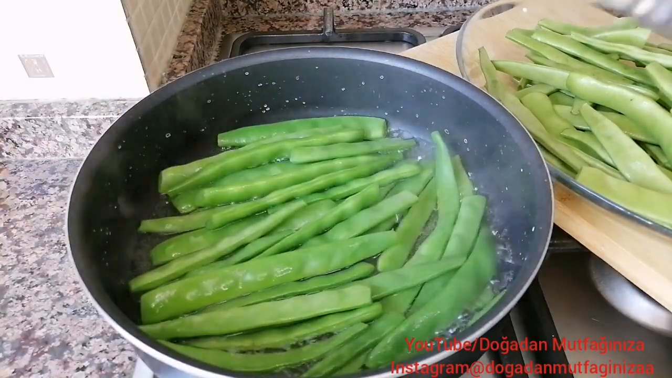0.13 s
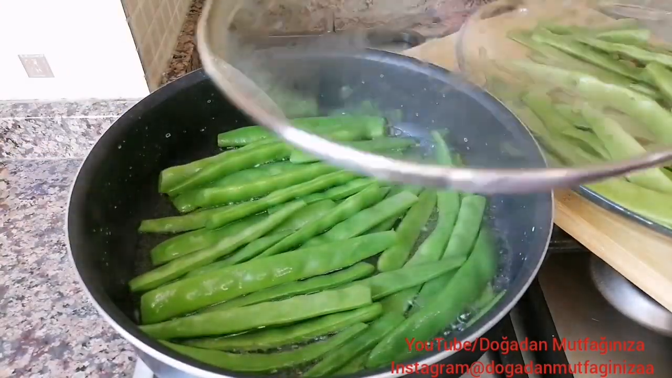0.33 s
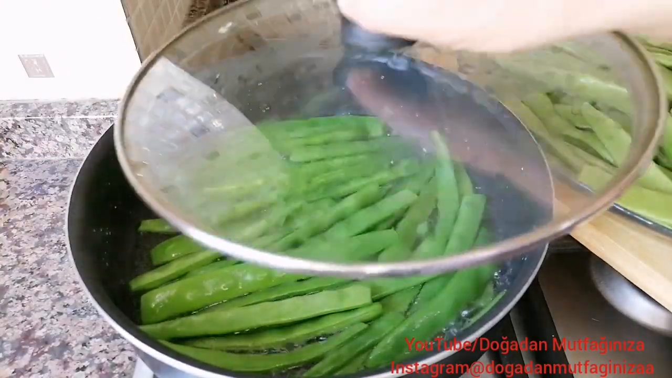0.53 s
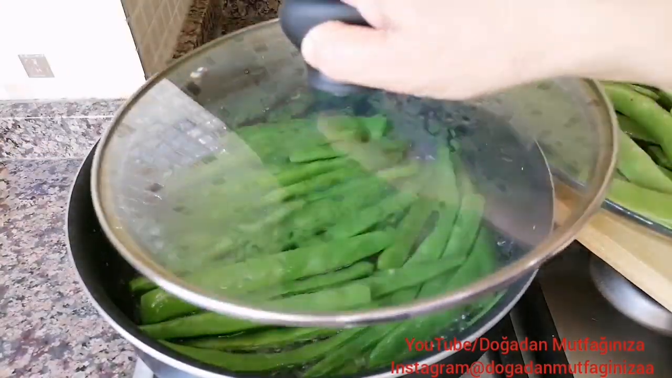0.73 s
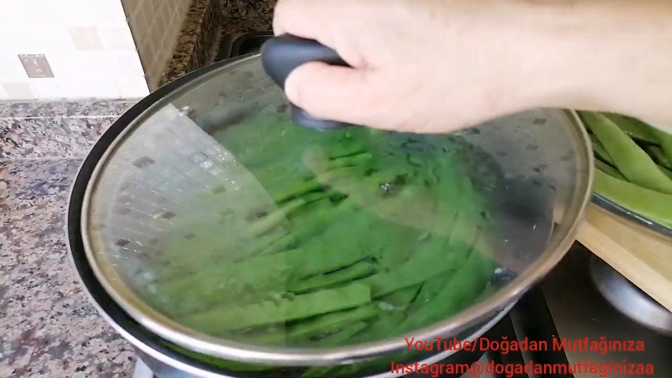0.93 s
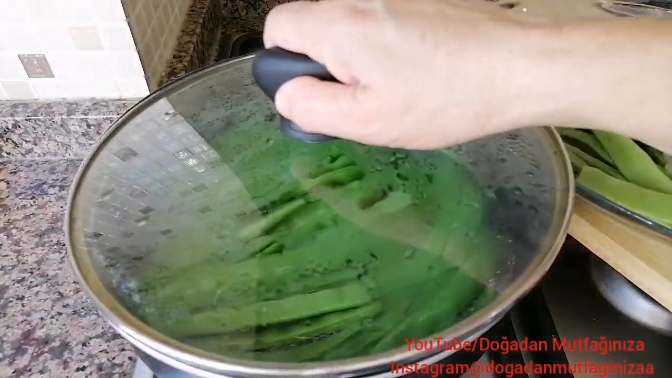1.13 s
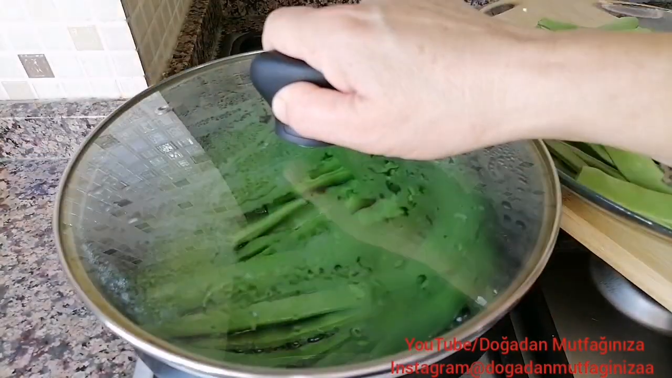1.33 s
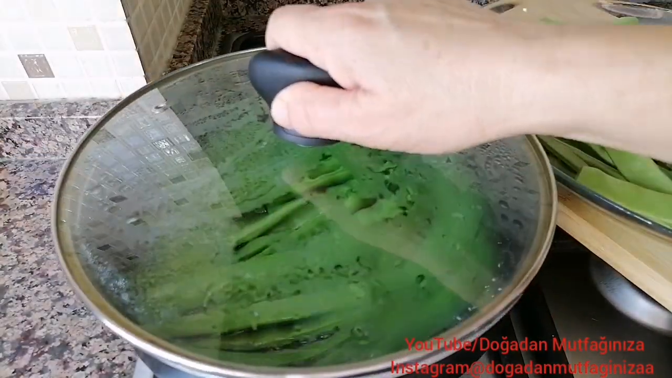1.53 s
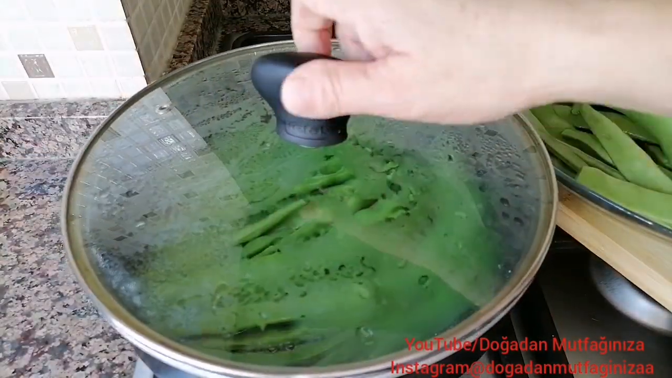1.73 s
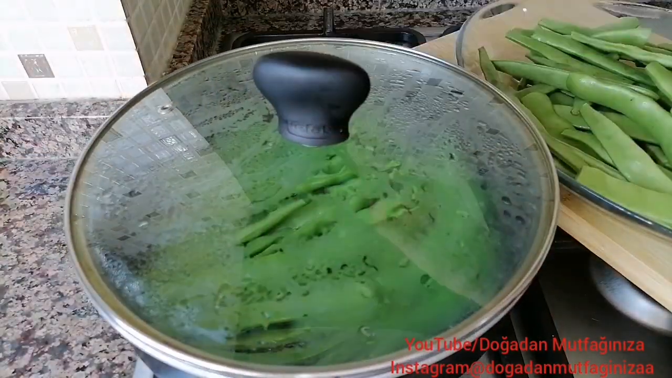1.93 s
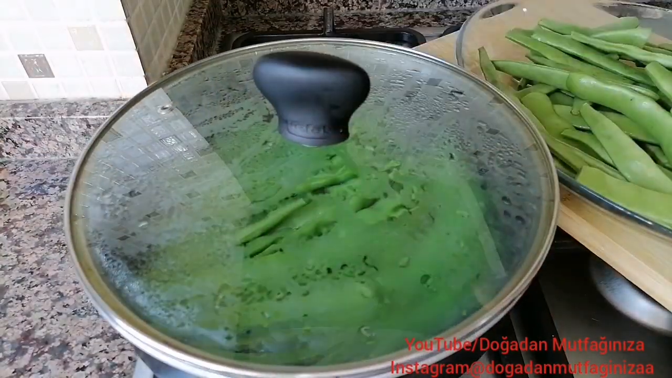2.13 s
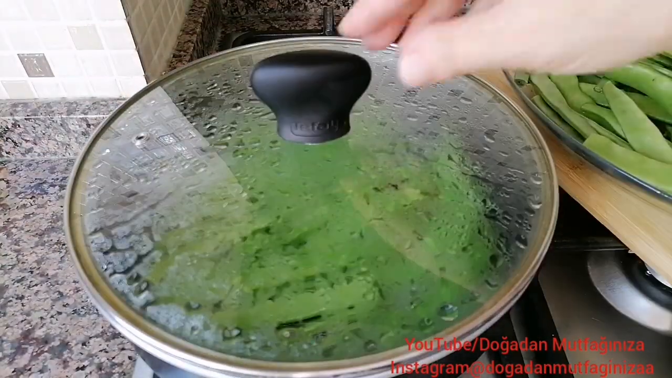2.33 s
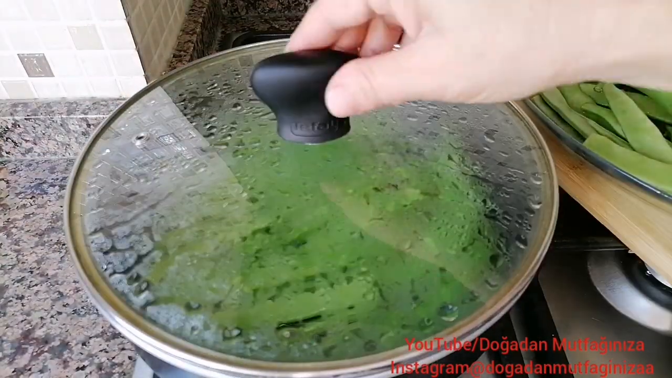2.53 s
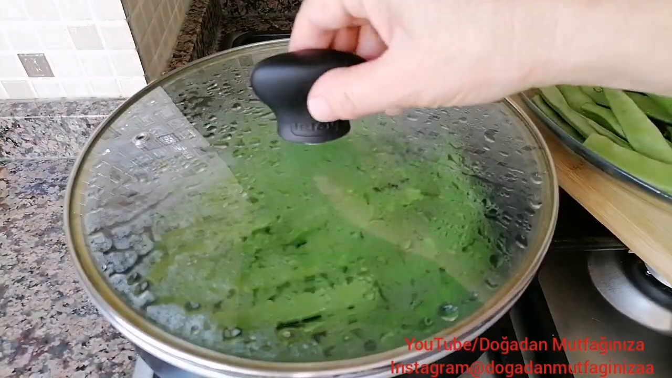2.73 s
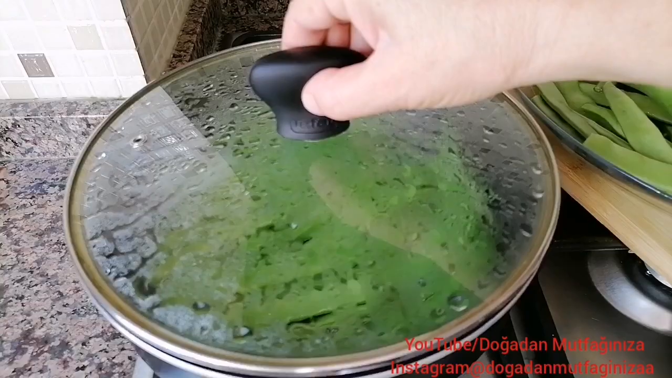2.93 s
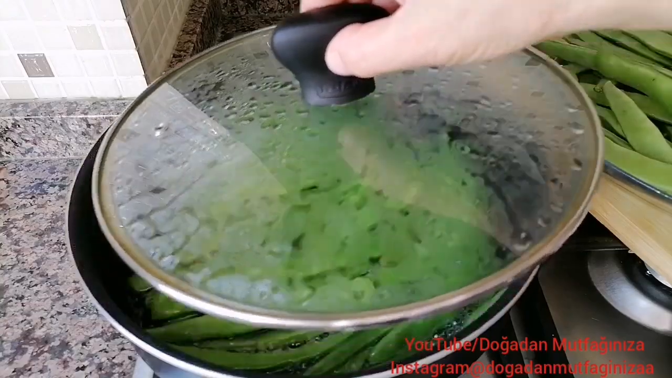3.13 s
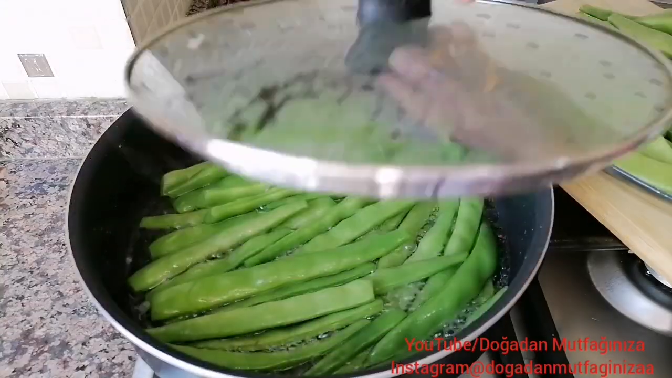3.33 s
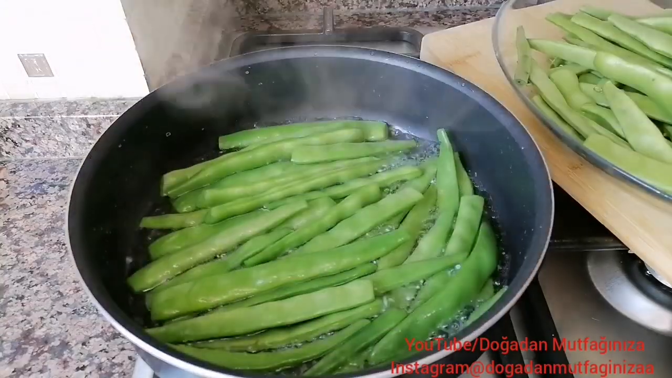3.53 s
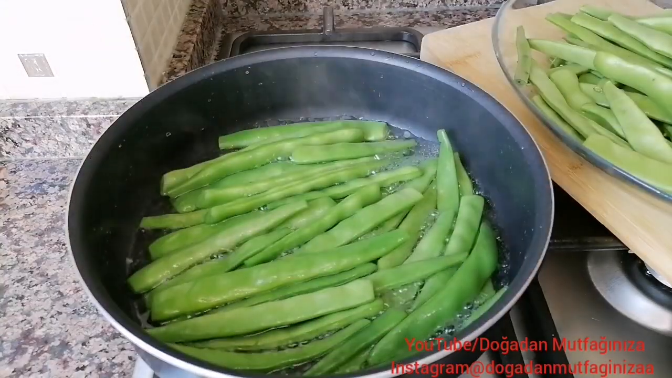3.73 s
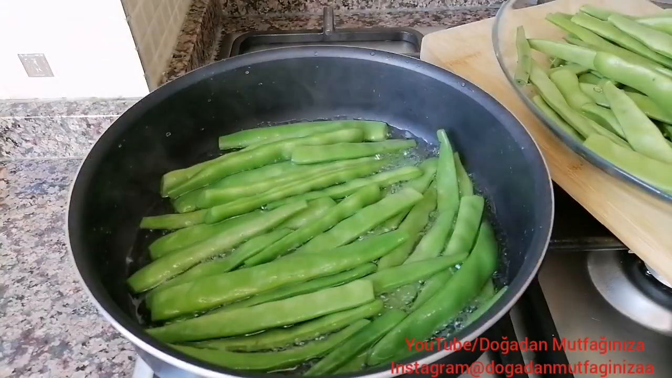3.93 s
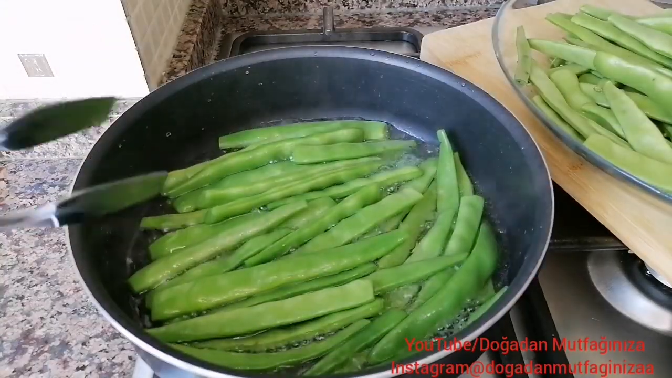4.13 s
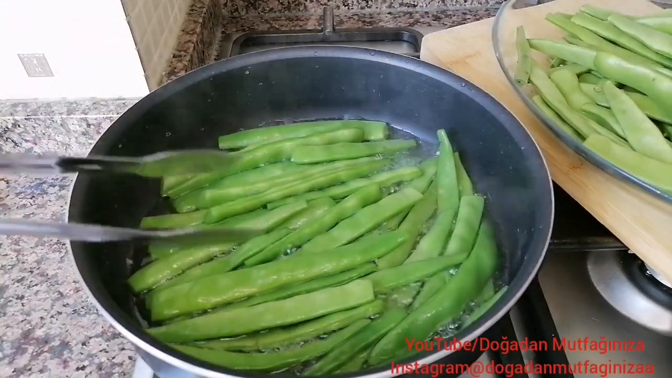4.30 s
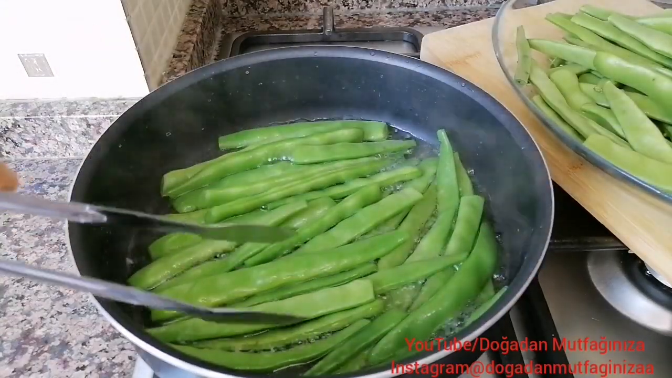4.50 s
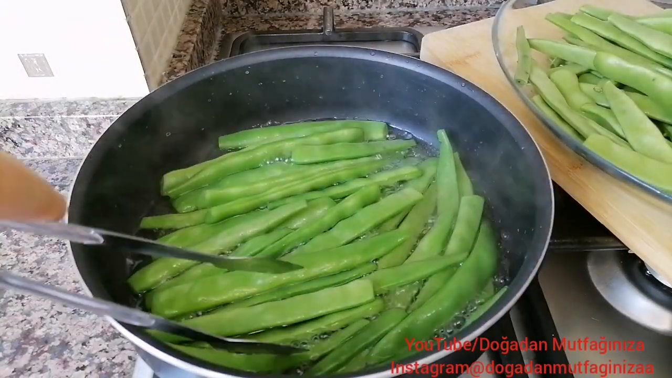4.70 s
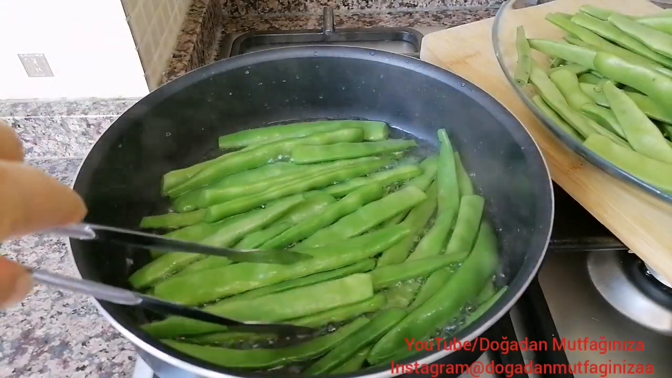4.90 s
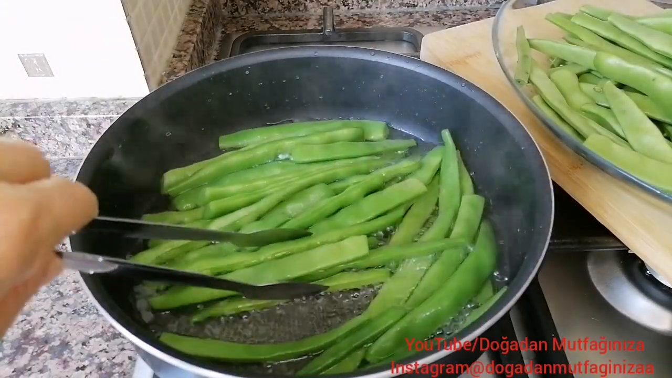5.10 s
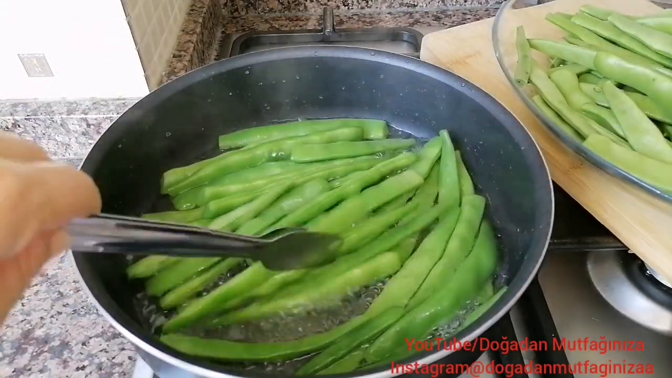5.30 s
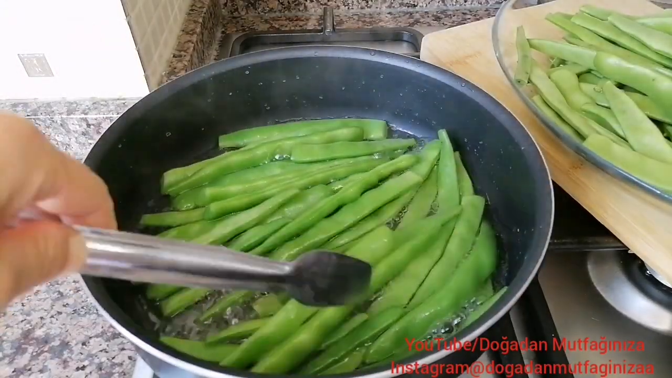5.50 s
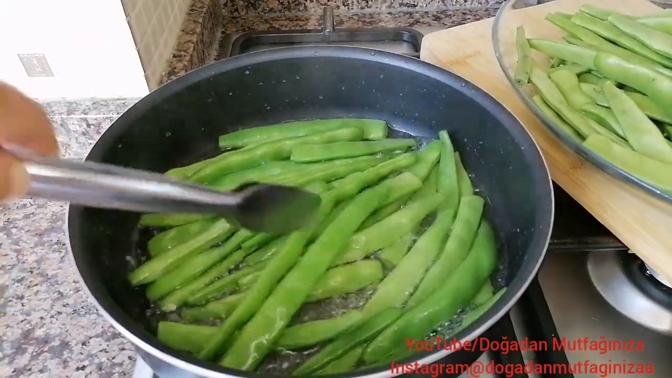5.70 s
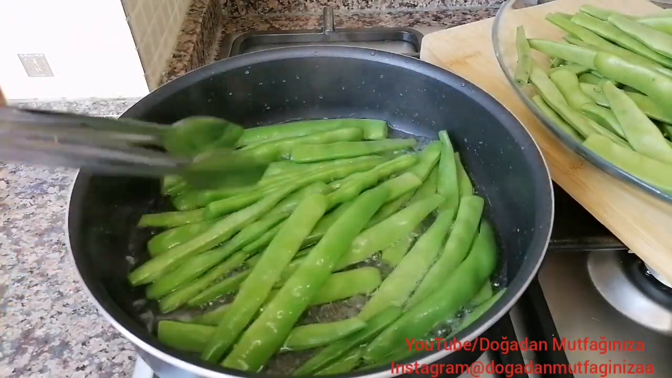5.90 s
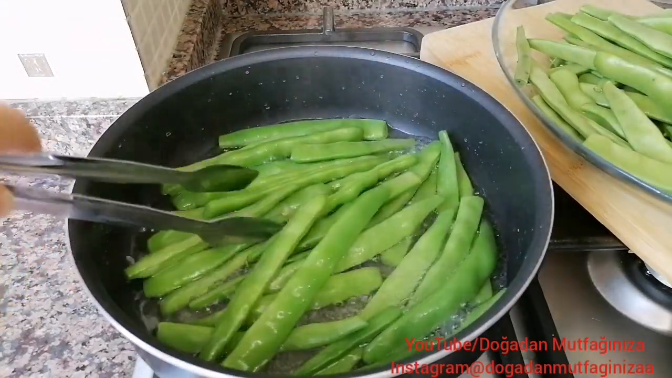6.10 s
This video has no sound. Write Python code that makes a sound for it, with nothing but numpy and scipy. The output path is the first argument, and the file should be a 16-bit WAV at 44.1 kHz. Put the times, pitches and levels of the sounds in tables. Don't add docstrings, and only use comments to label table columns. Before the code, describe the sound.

A steady fizzing simmer with snapping droplets is heard close up in a tiled kitchen. The lid clatters onto the rim, glass and metal ringing briefly, and a last heavy knock booms through the cooker. The sound abruptly becomes softer, with faint squeaking steam under the lid. Lifting it opens the sizzle with soft hollow whooshing tones, then plopping bubbles, a gentle tap and thin, bright metallic scrapes.

```python
import sys
import numpy as np
from scipy import signal
from scipy.fft import rfft, irfft, next_fast_len
from scipy.io import wavfile
from scipy.ndimage import uniform_filter1d, map_coordinates

SR = 44100
rng = np.random.default_rng(int(sys.argv[2]) if len(sys.argv) > 2 else 0)


def unload_audio(sound):
    columns = np.transpose(np.atleast_2d(sound))
    steps = np.round(np.clip(columns, -1, 1) * 32767)
    wavfile.write(sys.argv[1], SR, steps.astype(np.int16))


def magnitude_from_level(level_db):
    exponent = np.asarray(level_db, float) / 20
    return 10 ** exponent


N = 271215
CUT = 2.195

# start_s, share (0-1)
LID_COVER = [(.6, 0.38), (1.06, 0.36), (1.25, 0.82), (1.5, 0.93), (3.05, 1), (3.2, 0.98), (3.5, 0.69)]


def unit(x):
    return x / np.sqrt(np.mean(x ** 2) + 1e-20)


def along(points, hz):
    f, v = np.transpose(points)
    return np.interp(np.log(hz + 1), np.log(f + 1), v)


def over_time(points):
    s, value = np.transpose(points)
    return np.interp(np.arange(N) / SR, s, value)


def wobble(rate):
    knots = rng.standard_normal(int(N * rate / SR) + 4)
    return map_coordinates(knots, [np.arange(N) * rate / SR])


def filtered(x, response):
    m = next_fast_len(N + SR // 2)
    return irfft(rfft(x, m) * response(np.fft.rfftfreq(m, 1 / SR)), m)[..., :N]


def causal(spectrum):
    size = 2048
    level = magnitude_from_level(along(spectrum, np.fft.rfftfreq(size, 1 / SR)))
    ceps = irfft(np.log(np.maximum(level, 1e-4)))
    ceps[1:size // 2] *= 2
    ceps[size // 2 + 1:] = 0
    h = irfft(np.exp(rfft(ceps)))
    return h / np.linalg.norm(h)


def place(out, s, sound):
    out[:, round(s * SR):][:, :sound.shape[-1]] += sound


def bursts(count, spread_db):
    at, size, sign = rng.random((count, 3)).T
    height = magnitude_from_level(-spread_db * np.log(size + 0.0062))
    return np.bincount((at * N).astype(int), np.sign(sign - .5) * height, N)


def simmer_noise(spectrum, grainy, spread_db, patchy_db, count):
    # pitch_hz, likeness (0-1)
    likeness = [(60, 0.26), (290, 0.75), (640, 0.23), (1400, 0.066), (3100, .02), (5500, 0.091),
                (7500, 0.54), (10000, 1), (15000, 0.98)]
    z = signal.stft(rng.standard_normal((2, N)), nperseg=512)[2]
    field = uniform_filter1d(rng.standard_normal(z.shape[1:]), size=6, axis=0)
    field = uniform_filter1d(field, size=8, axis=1)
    pair = unit(signal.istft(z * magnitude_from_level(patchy_db * unit(field)), nperseg=512)[1][:, :N])

    def mid_side(hz):
        turn = np.arccos(np.clip(along(likeness, hz), -1, 1)) / 2
        return np.array([np.cos(turn), np.sin(turn)])

    mid, side = filtered(pair, mid_side)
    grains = unit(bursts(count, spread_db))
    left = mid + side + grainy * grains
    right = mid - side + grainy * np.roll(grains, shift=5)
    return unit(signal.fftconvolve(np.array([left, right]), causal(spectrum)[None], axes=1)[:, :N])


def simmer():
    # pitch_hz, level_db (per Hz)
    rumble_colour = [(12, -39), (20, 4.5), (75, 0.5), (113, 1.5), (189, -7), (300, -3.5), (390, -27.5),
                     (660, -120)]
    bubble_colour = [(120, -31.5), (200, -36), (286, -19.5), (325, -2.5), (393, -7.5), (435, -8),
                     (464, -7.5), (671, -9.5), (743, -5.5), (1020, -9), (1400, -7.5), (1790, -10),
                     (2560, -11.5), (2940, -7.5), (4200, -18), (5460, -45), (9240, -120)]
    fizz_colour = [(2600, -50), (3800, -33), (4330, -9), (5320, -4.5), (6210, -7.5), (7630, -7),
                   (8440, -2.5), (9000, -0.5), (9960, -4), (10900, -10), (13900, -14), (14800, -11),
                   (15300, -11), (15700, -23)]
    # start_s, level_db
    boil_vigour = [(0, 2), (.39, 2), (.9, 0.5), (1.5, -0.5), (2.19, -1), (2.21, -2), (2.45, 1),
                   (2.85, -1.5), (3.1, 0.5), (3.55, 3.5), (4, 1.5), (4.85, 0.5), (5.07, 1), (5.25, 2.5),
                   (5.45, 0.5), (6.15, 1.5)]
    open_db = [-63.5, -58, -56]
    lid_db = [-3.5, -14, -6.5]
    follows = [0.32, 1, 1.6]
    later_db = [-6, -5.5, -8]
    hum_db = [-63.5, -71]
    lean_db = [0.8, -5]
    lean_drift = [-0.48, 0.64]

    t = np.arange(N) / SR
    later = (t > CUT).astype(int)
    levels = np.c_[open_db] + np.c_[lid_db] * over_time(LID_COVER)
    levels = levels + np.c_[follows] * over_time(boil_vigour) + np.c_[later_db] * later
    burble_db, patter_db, fizz_db = levels
    lean = np.take(lean_db, later) + np.take(lean_drift, later) * (t - CUT * later)
    surge = wobble(12)

    rumble = simmer_noise(rumble_colour, 0, 1, patchy_db=2.0, count=10)
    rumble *= magnitude_from_level(np.take(hum_db, later))
    bubbles = simmer_noise(bubble_colour, 0.42, 4.2, patchy_db=2.0, count=3000)
    burble = filtered(bubbles, lambda f: 1 / (1 + (f / 1100) ** 4))
    patter = bubbles - burble
    bubbles = magnitude_from_level(burble_db) * unit(burble) + magnitude_from_level(patter_db) * unit(patter)
    bubbles *= magnitude_from_level(0.2 * surge + 1.64)
    fizz = simmer_noise(fizz_colour, 0.45, 5.8, patchy_db=1.6, count=5000)
    fizz *= magnitude_from_level(fizz_db + 0.5 * surge + 0.98 * wobble(40))
    return (rumble + bubbles + fizz) * magnitude_from_level([lean / 2, -lean / 2])


def droplets():
    # start_s, level_db (peak), lean_db (left minus right)
    loud_pops = [(0.1119, -41, 13), (0.2448, -39, 2.0), (0.304, -39.5, 0.5), (0.3144, -36, 6),
                 (0.5044, -49, 2.0), (2.152, -45, 0), (3.289, -43, -3.0), (3.3603, -48.5, 5),
                 (3.3947, -52, -3.5), (3.424, -43.5, -8), (3.4394, -48, -4.0), (3.5084, -47, -15),
                 (3.576, -45, -8), (3.615, -42, -11), (3.6517, -48, -6), (3.6885, -46.5, 2),
                 (3.713, -46, 1), (3.7224, -48, -4), (3.75, -46, -2.0), (3.8218, -47, -4),
                 (3.93, -49, -0.5), (3.987, -41.5, -14), (4.023, -46, -18), (4.0487, -57, -2),
                 (4.133, -63, 1), (4.162, -47, 0), (4.2038, -54, -1.0), (4.282, -51, 17), (4.339, -47, 1),
                 (4.3869, -44, 1), (4.419, -51, -4.0), (4.458, -54, -3), (4.497, -50, -2), (4.527, -53, -2),
                 (4.705, -51, -2), (4.6399, -45.5, -3), (4.794, -48, -1.0), (4.8577, -51, 15),
                 (4.947, -50, -1.0), (4.9985, -61, 2), (5.0537, -44.5, -1.5), (5.4545, -53, -2.0),
                 (5.6958, -43.5, -2.5), (5.8892, -53, -2), (5.9142, -50, -2), (5.9835, -53, -2),
                 (3.2073, -52, -2), (6.0975, -49, -1)]
    # pitch_hz, level_db (per Hz)
    spit_colour = [(3000, -40), (5000, -19), (7000, -8), (8800, 0), (10500, -7), (14500, -13), (15600, -26)]
    per_s, small_size_db, spread_db, under_lid_db = 260, -64, 2.2, -18
    pitch_scatter = .06
    out, t = np.zeros((2, N + SR)), np.arange(600) / SR
    at, size, side = rng.random((round(per_s * N / SR), 3)).T * [[N / SR], [1], [1]]
    small_db = small_size_db - spread_db * np.log(size + .02)
    small_db += under_lid_db * np.interp(at, *np.transpose(LID_COVER))
    for s, db, pan_db in loud_pops + list(zip(at, small_db, 8 * (side - .75))):
        snap = rng.standard_normal(len(t)) * (magnitude_from_level(-60 * t / .009) + .3 * magnitude_from_level(-60 * t / .03))
        pitch = np.exp(pitch_scatter * rng.standard_normal())
        snap = np.convolve(snap, causal(spit_colour * np.array([pitch, 1]))[:200])
        pan = np.array([[pan_db], [-pan_db]]) / 2
        place(out, s, magnitude_from_level(db - 2.5 + pan) * snap / abs(snap).max())
    return out[:, :N]


def ticks():
    # start_s, level_db (peak), pitch_hz
    tick_events = [(2.36, -72, 1090), (3.1993, -70, 1200), (3.442, -50, 3600), (3.5996, -52, 1410),
                   (3.601, -46, 3100), (3.614, -50, 1260), (3.651, -51, 2090), (3.703, -49, 1930),
                   (3.894, -51.5, 2946), (3.903, -56, 3000), (4.095, -53.5, 2600), (4.133, -54, 1490),
                   (4.205, -48, 3300), (4.3303, -53.5, 1036), (4.5, -56, 1364), (4.5397, -51.5, 1400),
                   (4.7443, -57, 1380), (4.798, -53, 1270), (4.944, -55, 1380), (5.025, -58, 1390),
                   (5.115, -53, 3060), (5.137, -51, 2900), (5.138, -56, 6800), (5.4, -55, 1900),
                   (5.406, -54, 400), (5.412, -56, 1000), (2.499, -53, 302), (2.986, -52.5, 220),
                   (5.723, -56, 945)]
    cycles = 3.4
    out, t = np.zeros((2, N + SR)), np.arange(600) / SR
    for s, db, hz in tick_events:
        tick = np.sin(2 * np.pi * hz * t) * np.exp(-t * hz / cycles) * (1 - t / t[-1])
        place(out, s, magnitude_from_level(db - 2.5 + np.array([[-1.5], [1.5]])) * tick)
    return out[:, :N]


def plops():
    # start_s, level_db (peak)
    plop_events = [(2.499, -55.5), (2.987, -57), (3.141, -57), (3.275, -53), (3.326, -56), (3.727, -54.5),
                   (3.849, -52), (4.112, -51), (4.211, -50), (4.26, -50.5), (4.438, -47.5), (4.539, -55),
                   (4.705, -48.5), (5.398, -45.5), (5.648, -49.5), (5.93, -51.5)]
    open_hz, lid_ratio, scatter = 834, 0.646, 0.076
    out, t = np.zeros((2, N + SR)), np.arange(600) / SR
    for s, db in plop_events:
        hz = open_hz * lid_ratio ** np.interp(s, *np.transpose(LID_COVER))
        hz *= 1 + scatter * rng.standard_normal()
        swell = 1 - np.exp(-t * hz * 3)
        plop = np.sin(2 * np.pi * hz * t * (1 + 8 * t)) * np.exp(-t * hz / 7.7) * swell
        place(out, s, magnitude_from_level(db - 10.0 + np.array([[-1.2], [1.2]])) * plop)
    return out[:, :N]


def nearby(x):
    echo_db, t60, change_s = -8, .05, .6
    t, clock, out = np.arange(SR // 20) / SR, np.arange(N) / SR / change_s, x.copy()
    bright = filtered(x, lambda f: 1j * f / (900 + 1j * f))
    for k in range(int(clock[-1]) + 2):
        echo = rng.standard_normal(len(t)) + 0.9 * rng.standard_normal((2, len(t)))
        echo = echo * magnitude_from_level(-60 * t / t60) * (t > .001)
        echo = magnitude_from_level(echo_db) * echo / np.linalg.norm(echo[0])
        fade = np.cos(np.pi / 2 * np.clip(clock - k, -1, 1))
        out = out + signal.oaconvolve(bright * fade, echo, axes=1)[:, :N]
    return out


def fuzzy_lines(glides, blur, flutter, steady, count):
    out, t = np.zeros(N), np.arange(N) / SR
    for s, length, from_hz, to_hz, db in glides * count:
        u = (t - s) / length
        hz = from_hz + (to_hz - from_hz) * np.clip(u, 0, 1)
        phase = 2 * np.pi * np.cumsum(hz * (1 + blur * wobble(flutter))) / SR
        swell = magnitude_from_level(db - 12 * np.clip(2 * u - 1, -1, 1) ** 4) * (abs(u - .5) < .5)
        out += swell * (steady + wobble(flutter)) * np.sin(phase)
    return out


def hollow():
    # start_s, length_s, from_hz, to_hz, level_db
    air_gap = [
        (.55, .56, 660, 500, -72),
        (2.97, .15, 220, 350, -73),
        (3.09, .1, 340, 440, -69),
        (3.18, .2, 540, 620, -72),
        (3.235, .05, 345, 335, -68),
        (3.17, .24, 340, 320, -76),
        (3.29, .15, 500, 500, -76),
    ]
    glass_bowl = [
        (3.17, .22, 1240, 1270, -76),
        (3.12, .26, 1890, 1990, -81),
        (3.12, .62, 3400, 3030, -79.5),
        (3.38, .28, 5200, 5900, -80),
    ]
    gap = fuzzy_lines(air_gap, 0.11, 60, 0.9, count=3)
    return gap + fuzzy_lines(glass_bowl, 0.053, 120, 0, count=4)


def kitchen(x):
    # pitch_hz, t60_s (time to fall 60 dB)
    echo_t60 = [(100, 0.71), (500, 0.4), (2000, 0.52), (5000, 0.36), (12000, 0.13)]
    hz, t, z = signal.stft(rng.standard_normal((2, SR // 2)), SR, nperseg=256)
    unlike = np.clip(hz / 900, .1, 1)[:, None]
    z = np.array([z[0] + unlike * z[1], z[0] - unlike * z[1]]) / np.sqrt(1 + unlike ** 2)
    tail = signal.istft(z * magnitude_from_level(-60 * t / along(echo_t60, hz)[:, None]), SR, nperseg=256)[1]
    late = np.pad(x, (250, 0))[None]
    return signal.fftconvolve(late, tail / np.linalg.norm(tail[0]), axes=1)[:, :N]


def struck(blows, modes, rise, thud, clatter_db, wet_db):
    # pitch_hz, level_db (per Hz)
    clatter_colour = [(120, -40.5), (200, -4.5), (526, -4), (680, -10), (957, -3), (1240, -15),
                      (1640, -15.5), (1980, -22), (2550, -30.5), (3750, -40), (6000, -46), (7800, -94.5),
                      (13200, -120)]
    start_scatter = .3
    out, t = np.zeros((2, N + SR)), np.arange(SR // 2) / SR
    for s, db, hard in blows:
        ring = np.zeros((2, len(t)))
        for hz, level_db, t60 in modes:
            shape = magnitude_from_level(-60 * t / t60) + thud * magnitude_from_level(-60 * t / min(t60, 0.033))
            shape *= magnitude_from_level(level_db + rng.uniform(-0.42, 1)) * (1 - np.exp(-t * hz / rise))
            apart = np.array([[1], [-1]]) * rng.normal(0.12, min(hz / 2500, 1.2))
            ring += shape * np.sin(2 * np.pi * (hz * t + start_scatter * rng.random()) + apart)
        noise = rng.standard_normal((2, len(t))).ravel()
        clatter = np.convolve(noise, causal(clatter_colour))[:2 * len(t)].reshape(2, -1)
        clatter *= magnitude_from_level(clatter_db - 60 * t / 0.21) * (1 - np.exp(-t / 0.0008))
        crack = magnitude_from_level(clatter_db - 2.5 - 60 * t / 0.0064) * (1 - np.exp(-t / 0.00083))
        crack = crack * rng.standard_normal((2, len(t)))
        push = np.hanning(3 + int(SR * 0.0024 * (1 - np.clip(hard, 0, 1)) ** 2))
        hit = signal.fftconvolve(ring / abs(ring).max() + clatter + crack, push[None] / push.sum(), axes=1)
        place(out, s, magnitude_from_level(db) * hit)
    return out[:, :N] + magnitude_from_level(wet_db) * kitchen(out[0, :N])


def lid_touch():
    # start_s, level_db, hardness (0-1)
    touches = [
        (1.0746, -18.5, 1),
        (1.098, -27, 0.53),
        (1.122, -35, 0.37),
        (1.18, -42.5, 0.4),
    ]
    # pitch_hz, level_db, t60_s
    rim_modes = [(390, 10, 0.034), (290, -16, 0.68), (552, -12, 0.4), (812, -9.5, 0.19),
                 (1060, -8.5, 0.079), (1653, -4, 0.091), (1757, -7.5, 0.09), (2110, -5.5, 0.054),
                 (2500, -10.5, 0.049), (3310, -14.5, 0.11)]
    return struck(touches, rim_modes, 1.0, 1.13, clatter_db=-13.5, wet_db=-11.5)


def lid_edge():
    # start_s, level_db, hardness (0-1)
    edge_blows = [
        (1.0755, -39, .9),
        (1.2, -37, 0.7),
        (1.8398, -17.5, 1),
    ]
    # pitch_hz, level_db, t60_s
    edge_modes = [(2470, 3, 0.026), (1260, -6, .04), (1830, -4, .03)]
    # start_s, length_s, from_hz, to_hz, level_db
    tremble = [
        (1.24, .09, 342, 335, -47),
    ]
    ring = struck(edge_blows, edge_modes, .8, .3, clatter_db=-42, wet_db=-28)[0]
    return ring * np.array([[1.2], [-.8]]) + fuzzy_lines(tremble, .02, 40, 3, count=1)


def cooker():
    # start_s, level_db, hardness (0-1)
    jolts = [
        (1.077, -36, 0),
        (1.2, -47, 0.4),
        (1.38, -41.5, 0.4),
        (1.45, -46, 0.6),
        (1.841, -10.5, 0),
    ]
    sways = [
        (1.08, -41, 0.3),
        (1.15, -50, 0.1),
        (1.22, -46.5, .2),
        (1.44, -48, .2),
    ]
    # pitch_hz, level_db, t60_s
    boom_modes = [(63.7, -9.5, 0.85), (104, -1, .2), (117.6, 0.5, 0.56), (173.2, -5, 0.52),
                  (225, -5.5, 0.31)]
    support_modes = [(59.8, -2, 0.59), (86, -7, 0.36)]
    boom = struck(jolts, boom_modes, 0.11, 1.12, clatter_db=-41.5, wet_db=-20.0) * magnitude_from_level([[1.1], [-1.1]])
    return boom + struck(sways, support_modes, 0.6, 0, clatter_db=-52, wet_db=-24.0)


def rattle():
    # start_s, level_db, t60_s
    shivers = [
        (1.094, -50, 0.028),
        (1.199, -59.5, 0.024),
        (1.839, -46, 0.066),
        (1.8766, -36.5, 0.063),
        (1.892, -49.5, 0.32),
        (2.153, -68, 0.15),
    ]
    # pitch_hz, level_db (per Hz)
    shiver_colour = [(1760, 1.5), (3000, -8), (3910, -14), (4290, -12), (6040, -12), (9730, -8.5),
                     (10400, -20.5), (14800, -31), (16000, -28)]
    out, t = np.zeros((2, N + SR)), np.arange(SR // 4) / SR
    for s, db, t60 in shivers:
        noise = rng.standard_normal(len(t)) + 4 * rng.standard_normal((2, len(t)))
        place(out, s, magnitude_from_level(db - 60 * t / t60) * noise)
    return signal.fftconvolve(out, causal(shiver_colour)[None], axes=1)[:, :N]


def lid_drop():
    # start_s, level_db, hardness (0-1)
    drops = [
        (1.1995, -16, 0.8),
        (1.221, -38, 0),
        (1.255, -48, 0),
    ]
    # pitch_hz, level_db, t60_s
    glass_modes = [(338, 5.5, 0.125), (258, -14, 0.2), (395, -3, 0.08), (645, -26, 0.11), (905, -5, 0.084),
                   (1550, -15.5, 0.042), (2130, -17.5, 0.027)]
    return struck(drops, glass_modes, 0.55, 2.3, clatter_db=-19, wet_db=-15.0)


def lid_rock():
    # start_s, level_db, hardness (0-1)
    rocks = [
        (1.377, -20, 0.05),
        (1.402, -24.5, 0.1),
        (1.445, -29, 0.25),
    ]
    chinks = [
        (1.419, -35, 0.63),
        (1.44, -44, 0.4),
    ]
    # pitch_hz, level_db, t60_s
    seat_modes = [(315, 4, 0.04), (256, -2.5, 0.12), (547, -16.5, 0.08), (853, -5.5, 0.1)]
    far_modes = [(883, 2, 0.11), (552, -5, 0.34), (296, 8, 0.058), (1560, -11, 0.034)]
    rock = struck(rocks, seat_modes, 1.3, 2.7, clatter_db=-16.5, wet_db=-16.0)
    return rock + struck(chinks, far_modes, 1.0, 0.59, clatter_db=-40, wet_db=-18.0)


def lid_knock():
    # start_s, level_db, hardness (0-1)
    knocks = [
        (1.805, -40, 0.14),
        (1.83, -33, 0),
        (1.8392, -11.5, 0.78),
        (1.8785, -24, 0.48),
        (1.915, -27, 0.59),
    ]
    # pitch_hz, level_db, t60_s
    stove_modes = [(323, -7, 0.25), (408, -8, 0.21), (470, -0.5, 0.04), (549, -9, 0.1), (887, 0, 0.054),
                   (1040, -13, 0.13), (1090, -15, 0.11), (1320, -22.5, 0.09), (1620, -4.5, 0.049),
                   (2110, -14, 0.035), (2445, 2, 0.013), (2725, -15.5, 0.054), (3300, -12.5, 0.0184),
                   (4100, -10, 0.0096), (4700, -3.5, 0.0047)]
    return struck(knocks, stove_modes, 0.65, 3.5, clatter_db=-9.0, wet_db=-9.5)


def steam_squeaks():
    # start_s, length_s, from_hz, to_hz, level_db
    whistles = [(2.28, .035, 4600, 5100, -87), (2.36, .03, 6250, 6350, -83), (2.372, .05, 7270, 7550, -82),
                (2.415, .07, 6350, 6700, -79), (2.51, .1, 6400, 5100, -76.5), (2.44, .05, 6400, 6780, -72),
                (2.497, .03, 6850, 6200, -73), (2.55, .025, 5750, 5500, -77), (2.3, .07, 5100, 6100, -87),
                (2.485, .045, 7150, 7100, -78)]
    squeak = fuzzy_lines(whistles, .007, 150, 1.5, count=2)
    return squeak * magnitude_from_level([[-2.5], [1.5]]) + magnitude_from_level(-4) * kitchen(squeak)


def tongs():
    # start_s, hold_s, ring_db, sizzle_db, low_ring_db
    strokes = [
        (5.069, 0.17, -72.5, -70.5, -68),
        (5.256, 0.1, -56.5, -67, -81),
        (5.398, 0.012, -55, -78.5, -49.5),
        (5.453, .005, -65, -85.5, -76),
    ]
    # start_s, level_db (peak)
    slips = [(5.2385, -50), (5.255, -52), (5.2694, -49), (5.2824, -42), (5.294, -42), (5.298, -41),
             (5.3034, -43), (5.3074, -41), (5.3318, -39), (5.338, -38.5), (5.3414, -43), (5.345, -38),
             (5.396, -50), (5.403, -37.5), (5.408, -43)]
    # pitch_hz, width_hz, level_db
    steel_tones = [(6950, 220, -44), (8776, 340, 11.5), (8810, 64, 15), (10000, 650, -1), (10370, 134, 0.5),
                   (10600, 30, -5)]
    rise, fall = 610, 1200
    t = np.arange(N) / SR
    gains = 0
    for s, hold, *levels_db in strokes:
        stroke = np.minimum(rise * (t - s), fall * (s + hold - t))
        gains = gains + magnitude_from_level(np.c_[levels_db]) * magnitude_from_level(np.minimum(0, stroke))
    ring_gain, sizzle_gain, low_gain = gains
    roughness = magnitude_from_level(3.5 * wobble(200))
    rub = roughness * (rng.standard_normal(N) + 0.6 * rng.standard_normal((2, N)))
    catches = np.zeros(N)
    for s, db in slips:
        catches[round(s * SR):][:30] += magnitude_from_level(db + 2.0) * rng.standard_normal(30)

    def mode(f, centre, width):
        return 1j * f * width / (centre * centre - f * f + 1j * f * width)

    def steel(f):
        return sum((-1) ** k * magnitude_from_level(db) * mode(f, c, w + 150) for k, (c, w, db) in enumerate(steel_tones))

    ring = ring_gain * unit(filtered(rub, steel)) + filtered(catches, steel)
    sizzle = sizzle_gain * unit(filtered(rub, lambda f: mode(f, 13400, 6100) ** 2))
    low = low_gain * magnitude_from_level(-10.5) * unit(filtered(rub, lambda f: mode(f, 5960, 700) ** 2))
    return (ring + sizzle + low) * magnitude_from_level([[-2.2], [2.2]])


def slap():
    # level_db, hold_s, t60_s, from_hz, drift (Hz per s), width_hz
    slosh = (-53.5, .05, .22, 980, -1900, 420)
    start_s, length_s, knock_hz, knock_db = 5.1342, .007, 900, -34
    t = np.arange(N) / SR - start_s
    swell = np.sin(np.pi * np.clip(t / length_s, 0, 1)) ** 2
    knock = magnitude_from_level(knock_db) * swell * np.sin(2 * np.pi * knock_hz * t)
    db, hold, t60, from_hz, drift, width = slosh
    late = np.clip(t - length_s, 0, .3)
    phase = 2 * np.pi * (from_hz * late + drift * late ** 2 / 2)
    band = np.array([wobble(width) * np.sin(phase) + wobble(width) * np.cos(phase) for _ in range(3)])
    fade = magnitude_from_level(db - 60 * np.maximum(late - hold, 0) / t60) * (late > 0) * (late < .3)
    return (knock + fade * (band[0] + 0.35 * band[1:])) * magnitude_from_level([[-2.2], [2.2]])


def tap():
    # start_s, level_db, hardness (0-1)
    taps = [
        (5.1345, -47, 0.92),
    ]
    # pitch_hz, level_db, t60_s
    base_modes = [(796, -3, 0.18), (860, -9, 0.13), (973, -9, 0.18), (1085, -2.5, 0.12), (1560, 14, 0.028),
                  (2600, 10, 0.011), (6720, -10, 0.039)]
    return struck(taps, base_modes, 2.1, 1.5, clatter_db=-8.0, wet_db=-5) * magnitude_from_level([[-2.2], [2.2]])


def scene():
    boiling = nearby(simmer() + droplets() + ticks() + plops())
    knocks = lid_touch() + cooker() + rattle() + lid_drop() + lid_rock() + lid_knock()
    knocks = filtered(knocks, lambda f: (1j * f / (38 + 1j * f)) ** 2)
    knocks = knocks * (np.arange(N) < CUT * SR)
    return boiling + hollow() + knocks + lid_edge() + steam_squeaks() + tongs() + slap() + tap()


def low_pass(x):
    return signal.sosfilt(signal.butter(12, 16600, fs=SR, output="sos"), x)


def record(dry):
    # start_s (centre), half_width_s
    brief_dips = [
        (.066, 0.0044),
        (2.2, 0.004),
    ]
    t = np.arange(N) / SR
    dips = np.prod([np.clip(abs(t - s) / half, .1, 1) for s, half in brief_dips], axis=0)
    return low_pass(filtered(dry * dips, lambda hz: hz < 15770))


dry = scene()
out = record(dry)
unload_audio(out)
```